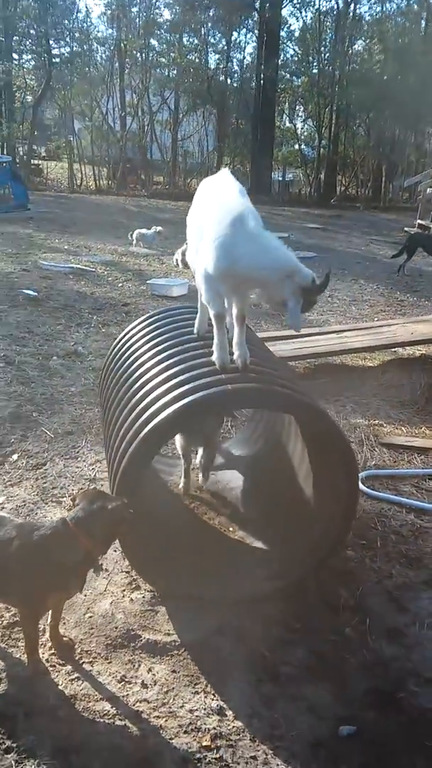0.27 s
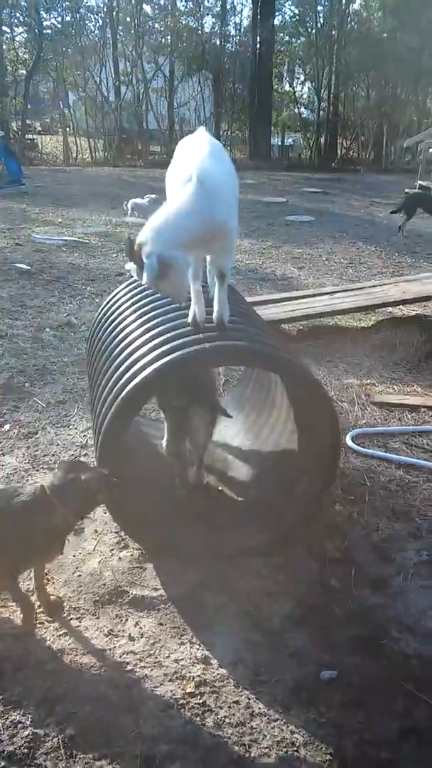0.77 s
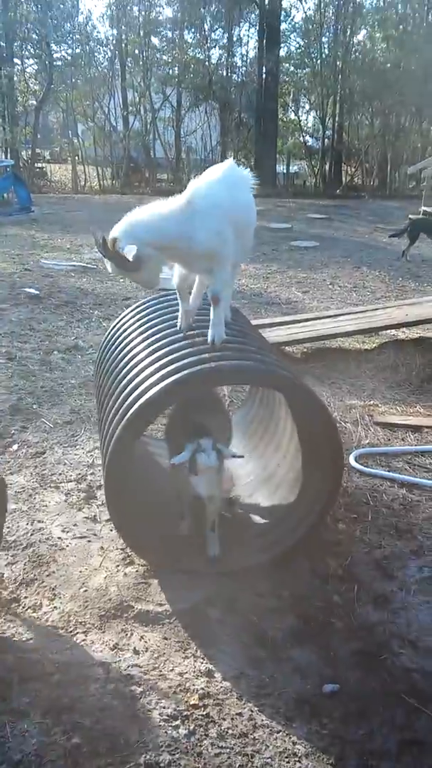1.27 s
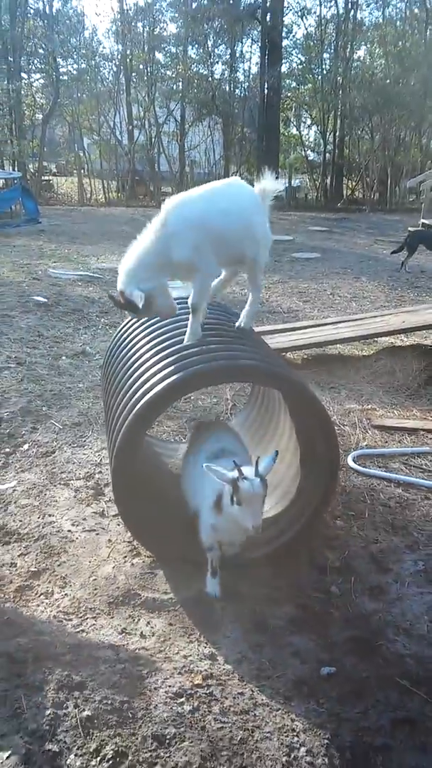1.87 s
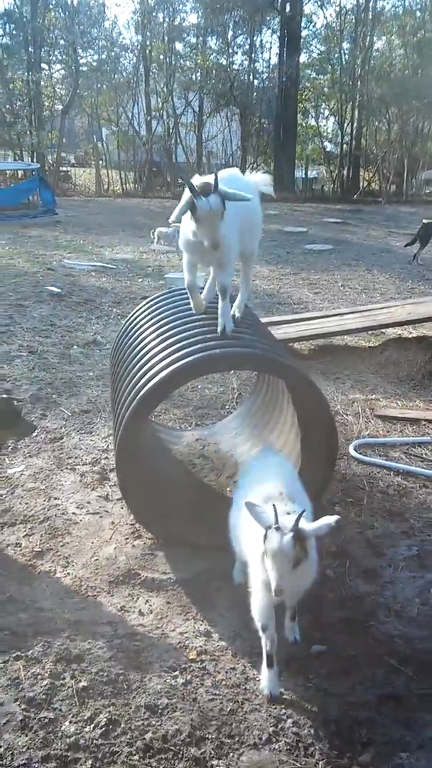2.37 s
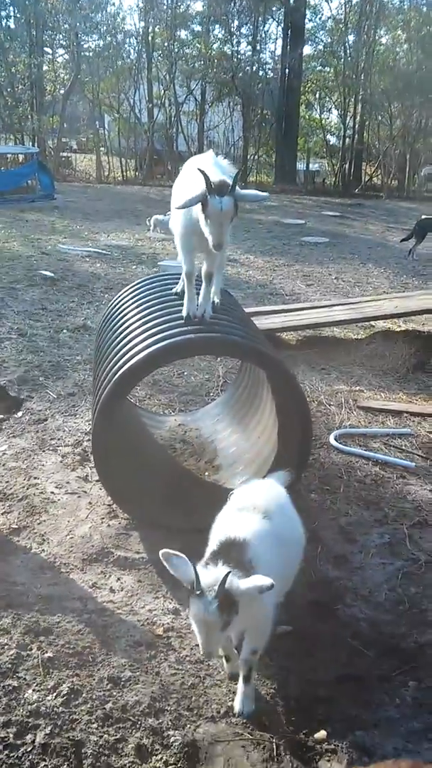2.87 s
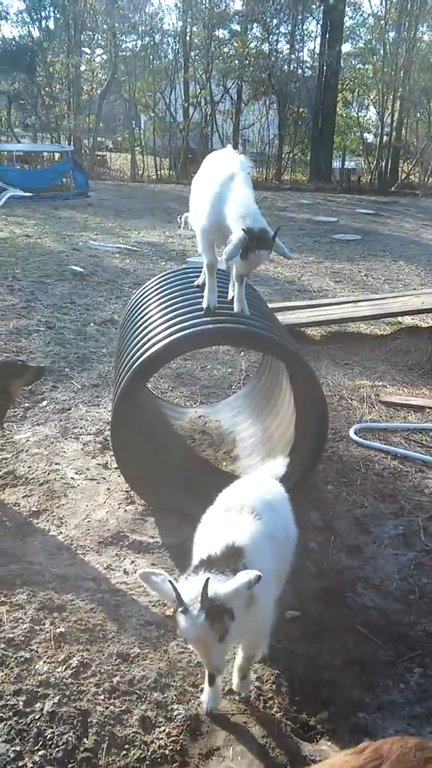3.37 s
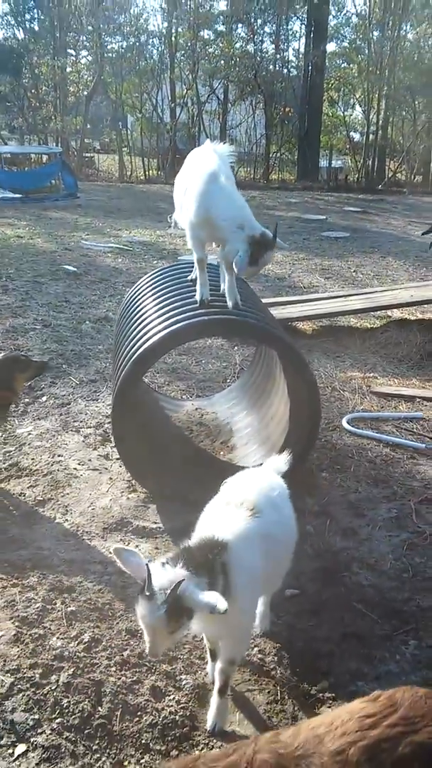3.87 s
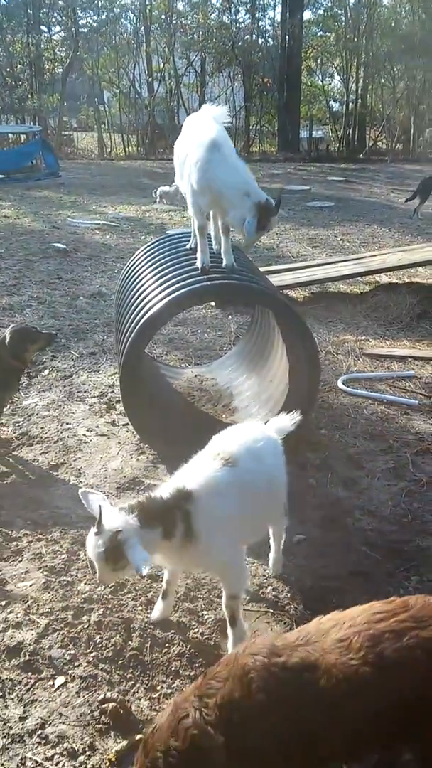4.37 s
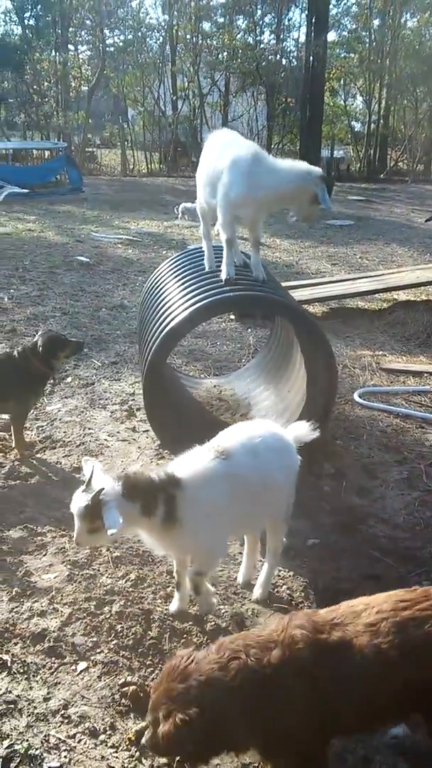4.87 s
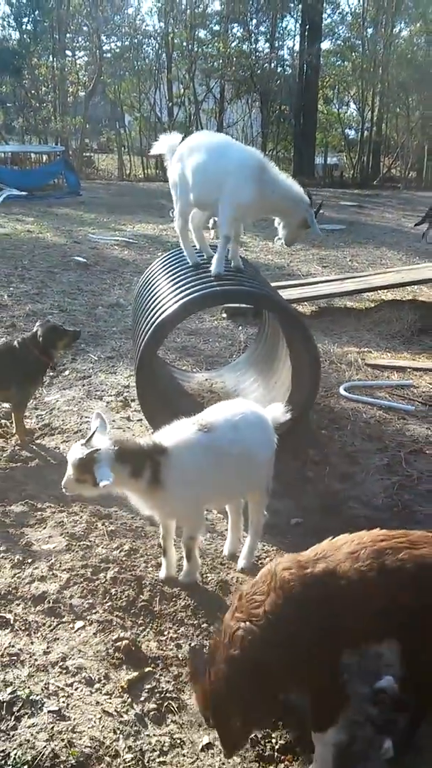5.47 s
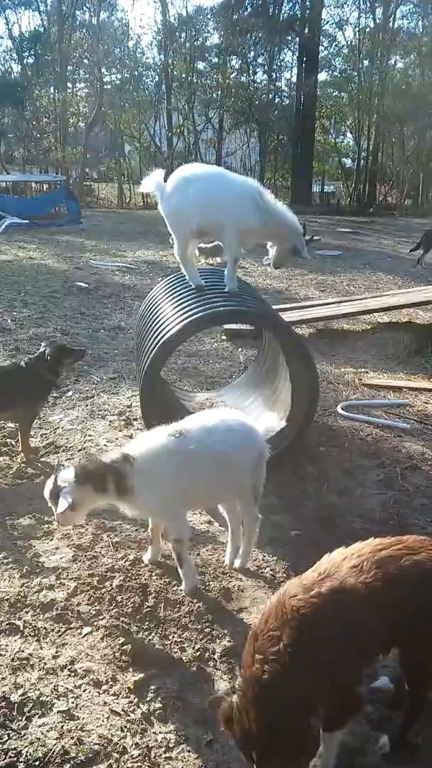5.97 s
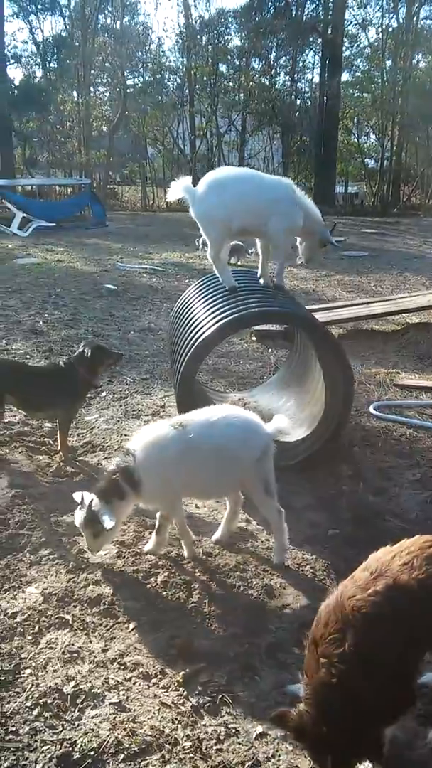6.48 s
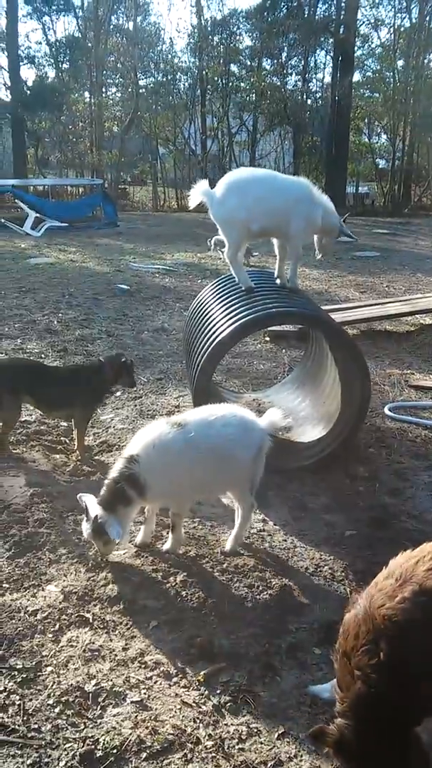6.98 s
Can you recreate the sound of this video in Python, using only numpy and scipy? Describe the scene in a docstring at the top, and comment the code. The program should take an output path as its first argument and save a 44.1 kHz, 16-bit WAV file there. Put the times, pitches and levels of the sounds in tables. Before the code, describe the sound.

In a yard with a faint low hum, dry leaves and dirt rustle softly. A dog gives one loud, high, yelping bark that echoes briefly off the trees. Right after, a goat's hooves clatter on a corrugated plastic pipe with dry taps and hollow thuds, and a small metal tag jingles faintly. Lighter, scattered hoof steps carry on to the end.

```python
"""A faint low hum hangs over a yard ringed by trees; dry leaves and dirt rustle and tick underfoot.
A goat sets a hoof softly on a big corrugated plastic pipe. Just after a second in, a dog gives one
high, yelping bark, which the trees echo, and a small tag jingles. Then the goat clatters about:
hoof edges tap the pipe wall and its weight sends hollow, falling thuds along it.
Lighter, scattered steps carry on to the end."""
import sys
import numpy as np
from scipy import signal
from scipy.fft import rfft, irfft
from scipy.io import wavfile
from scipy.ndimage import uniform_filter1d, minimum_filter1d

SR = 44100
rng = np.random.default_rng(int(sys.argv[2]) if len(sys.argv) > 2 else 0)


def generate_wav(signal):
    """Clip the signal to [-1, 1] and save it as 16-bit WAV at the path in sys.argv[1]."""
    frames = np.transpose(np.atleast_2d(signal))
    scaled = np.clip(frames, -1, 1) * 32767
    pcm = np.round(scaled).astype(np.int16)
    wavfile.write(sys.argv[1], SR, pcm)


N = 318622
T = np.arange(N) / SR


def undb(db):
    """Decibels to gain."""
    return 10 ** (np.asarray(db) / 20)


def unit(x):
    """Scale to an rms of one."""
    return x / np.sqrt(np.mean(x ** 2) + 1e-20)


def curves(rows):
    """Turn each column after the time into an automation curve, one value a sample."""
    s, *columns = np.transpose(rows)
    return [np.interp(T, np.sort(s), c) for c in columns]


def colour(x, points):
    """EQ a sound with a curve of (Hz, dB) points."""
    hz, db = np.transpose(points)
    bins_hz = np.fft.rfftfreq(len(x), 1 / SR)
    gain = undb(np.interp(np.log(bins_hz + 1), np.log(hz), db))
    return irfft(rfft(x) * gain, len(x))


def noise(points):
    """Coloured noise of unit level."""
    return unit(colour(rng.standard_normal(N), points))


def wander(rate):
    """Smooth random modulation that turns about rate times a second."""
    k = max(int(SR / rate), 1)
    return unit(uniform_filter1d(np.repeat(rng.standard_normal(N // k + 1), k), k)[:N])


def add(track, s, sound):
    """Mix a sound into a track at a time in seconds."""
    i = max(int(s * SR), 0)
    track[i:i + len(sound)] += sound[:max(N - i, 0)]


def delayed(x, s):
    """The sound, s seconds later."""
    return np.interp(T - s, T, x, left=0)


# Slow fader moves of the bed. Each row: time in seconds, then hum, air and stirring litter in dB.
BED_LEVELS = [(0, -49, -65.5, -63), (0.18, -48.5, -64, -62.5), (0.38, -56, -69, -66),
              (0.85, -54.5, -68.5, -66.5), (1.1, -59.5, -69.5, -71.5), (1.5, -55, -59, -58),
              (2.05, -51.5, -59.5, -56.5), (2.46, -64, -62, -57), (2.57, -75, -71, -74),
              (2.8, -65, -68.5, -65), (3.72, -65, -73, -79.5), (4.25, -59, -70, -73), (4.65, -61, -72, -72),
              (4.95, -55.5, -66, -70.5), (5.85, -45, -62, -61.5), (6.57, -48.5, -64.5, -67),
              (6.78, -56, -68, -68.5), (7.22, -63, -70, -70.5)]
# Tone of the low rumble and of the open air. Each row: frequency in Hz, level in dB.
RUMBLE_EQ = [(20, -30), (45, -15.5), (65, -2.5), (100, -2.5), (170, -2), (260, -12), (400, -26.5),
             (700, -47.5)]
AIR_EQ = [(100, 0), (300, 2.5), (550, -5), (1000, -1), (1550, -6), (2200, -14.5), (3500, -21),
          (6000, -24.5), (12000, -39)]


def hum_and_air(hum_hz=98.2, hum_db=-1, rumble_db=-4, air_db=1.5):
    """The bed: a wavering low hum in a soft rumble, and the open air."""
    low_db, open_db, _ = curves(BED_LEVELS)
    phase = 2 * np.pi * np.cumsum(hum_hz * (1 + .01 * wander(10))) / SR
    clarity = undb(.5 * (low_db - low_db.max()))  # the tone stands clear of the rumble as it swells
    hum = np.sqrt(2) * np.sin(phase) * clarity * undb(low_db + hum_db + wander(6.4))
    rumble = noise(RUMBLE_EQ) * undb(low_db + rumble_db) * (1.5 - clarity)
    air = noise(AIR_EQ) * undb(open_db + air_db + 0.42 * wander(15))
    return hum + rumble + air


# The crisp tone of dry leaves. Each row: frequency in Hz, level in dB.
RUSTLE_EQ = [(1760, -42), (3000, -14.5), (3480, -18), (5220, -20.5), (6220, -8), (8520, -5), (11100, 3),
             (15100, -4), (16000, -4.5)]


def leaf_rustle(rustle_envelope, spikiness=0.84, rustle_db=-0.5, crunch_db=1.5):
    """Dry leaves and dirt crackle faintly throughout and swell under each step."""
    _, _, stir_db = curves(BED_LEVELS)
    grains = rng.standard_normal(N) * np.exp(spikiness * rng.standard_normal(N))
    crackle = unit(colour(grains * undb(crunch_db * wander(150)), RUSTLE_EQ))
    return crackle * np.hypot(undb(stir_db), rustle_envelope) * undb(rustle_db)


# Cues for steps and, at 1.388 s, a brief high hiss trailing the bark.
# Each row: start in seconds, length in seconds, rustle level in dB, swell level in dB.
RUSTLE_CUES = [(0.209, .08, -58.5, -55), (0.412, 0.055, -56, -58), (0.606, .17, -59.5, -51.5),
               (0.879, 0.089, -56, -51.5), (1.388, 0.093, -54.5, -62), (1.623, 0.024, -54.5, -68),
               (1.703, 0.055, -51, -50), (1.846, 0.015, -48.5, -68), (1.989, .04, -54, -53),
               (2.1, .12, -57.5, -59.5), (2.63, .04, -56.5, -61), (2.83, .05, -64.5, -66),
               (2.948, 0.13, -68, -56.5), (3.226, 0.24, -66, -51), (3.514, 0.043, -66, -51),
               (3.805, 0.22, -88.5, -56), (4.011, 0.022, -64, -62), (4.25, .07, -64, -54),
               (4.43, .07, -73, -55.5), (4.72, .13, -66.5, -55.5), (5.358, .03, -58, -59),
               (5.872, 0.078, -65.5, -52.5), (6.23, 0.13, -66, -59), (6.58, .05, -64, -52.5),
               (6.98, .08, -67.5, -65.5)]


def cue_envelopes(attack_s=0.015, release_s=.025):
    """Envelopes for the rustle and the background swells: each cue rises, holds and dies away."""
    rustle, swell, t = np.zeros(N), np.zeros(N), T[:SR // 2]
    for s, length_s, rustle_db, swell_db in RUSTLE_CUES:
        shape = np.minimum(t / attack_s, 1) * np.exp(-np.maximum(t - length_s, 0) / release_s)
        add(rustle, s, undb(rustle_db) * shape)
        add(swell, s, undb(swell_db) * shape)
    return rustle, swell


def background_swells(swell_envelope, low_db=-2, mid_db=-14, flicker_db=2):
    """Low rumble and dull midrange noise swell briefly with each cue."""
    low = noise([(20, -32), (45, -23), (65, -7), (100, 4), (170, -10.5), (260, -15),
                 (400, -28.5), (700, -46)])
    mid = noise([(200, -2), (550, -4.5), (1000, -1.5), (1550, -9.5), (2200, -16),
                 (3500, -29.5), (8000, -29)])
    return swell_envelope * (undb(low_db) * low + undb(mid_db + flicker_db * wander(60)) * mid)


# Snaps underfoot. Each row: start in seconds, level in dB.
SNAPS = [(0.2279, -38), (0.2818, -29.5), (0.414, -31), (0.667, -27.5), (0.7492, -35), (0.9505, -34),
         (1.5613, -35), (1.727, -23), (2.2126, -27), (2.3337, -35), (2.6375, -34.5), (2.8459, -34.5),
         (3.4166, -30.5), (4.123, -38.5), (4.4528, -41), (6.5879, -40.5)]


def twig_snaps(decay_s=.0004, snap_db=-8):
    """Dry twigs and grit break in tiny, bright bursts of noise."""
    out, t = np.zeros(N), T[:SR // 100]
    for s, db in SNAPS:
        snap = rng.standard_normal(len(t)) * np.exp(-t / decay_s)
        add(out, s, undb(db + snap_db) * snap / np.abs(snap).max())
    return colour(out, [(1000, 3), (4500, -26), (7000, 5.0), (10000, 14.5), (16000, 14)])


# Hoof blows on the pipe; the row at 5.931 s is not a new blow but a strong return of the 5.883 s blow bouncing
# along the pipe. Each row: start in seconds, tap level in dB, tuning of the spot as a ratio, brightness in dB
# per octave, scuff length in seconds, thud level in dB, opening thud pitch in Hz.
HOOVES = [ (0.458, -57.5, 0.86, 9, 0.0052, -69, 350), (1.689, -33.5, 0.93, -3, 0.0082, -25, 421),
          (1.706, -24.5, 1.03, -3, 0.0032, -46, 400), (1.712, -25, 0.99, -13, .007, -28, 402),
          (1.731, -45.5, 1.35, 20, 0.0035, -21, 232.6), (1.765, -36.5, 1, -2, 0.011, -44, 302),
          (1.864, -26, 1, 6, 0.0074, -20, 488.3), (1.871, -29.5, 1.03, 14.5, 0.003, -20.5, 388),
          (1.892, -55, 0.83, -5, 0.0085, -24, 352), (1.99, -38, 0.99, 3.5, 0.014, -20.5, 300.6),
          (2.019, -21, 1.1, -14.5, 0.0027, -17.5, 327), (2.041, -36.5, 1.02, -18, 0.0053, -55, 331),
          (2.165, -29.5, 0.91, -5, 0.002, -39.5, 450), (2.184, -43, 1.03, 8, 0.0072, -43.5, 400),
          (2.203, -34.5, 1.08, 4, 0.0047, -41, 390), (2.265, -48, 0.96, 5, 0.0013, -58, 351),
          (2.338, -25, 1.03, -3.5, 0.001, -34.5, 413), (2.394, -53, 1, 15, .007, -41, 347.4),
          (2.795, -58, 1.08, -2.5, 0.011, -65, 300), (2.956, -46.5, 1.09, 3, 0.0074, -45.5, 407),
          (3.227, -41.5, 1.08, -12, 0.011, -30, 406), (3.274, -46.5, 1.13, -10, 0.017, -41.5, 393.4),
          (3.794, -44, 1.19, -5.5, .004, -60, 347), (3.943, -54.5, .8, -0.5, 0.012, -38, 329.6),
          (4.227, -61, 1.1, 1.5, 0.021, -42.5, 297), (4.741, -42, 1.07, -14, 0.0053, -54, 380),
          (4.765, -44, 1.03, -7, .018, -44, 322.2), (4.811, -40, .99, -7.5, 0.012, -47, 391.5),
          (4.89, -54.5, 0.98, -3, .007, -48, 340), (5.012, -50, 1.06, -10, .02, -58.5, 348.5),
          (5.13, -55.5, 1, 3, 0.0048, -43, 327), (5.181, -48, 0.92, 1.5, 0.013, -46, 381),
          (5.315, -58, 1.02, -4.5, 0.0021, -44, 359.4), (5.384, -38, 1.06, -8, 0.0053, -52.5, 378),
          (5.765, -46, 1.04, -2.5, 0.0033, -59, 350), (5.883, -27.5, 1.03, -19.5, .003, -42.5, 417),
          (5.931, -43, 1, -12, 0.02, -64, 383), (6.064, -37, 1.03, -12, 0.0092, -39.5, 310),
          (6.473, -60, 1, 12, .005, -67, 300), (6.614, -57, 1.03, 1.5, 0.006, -60, 320),
          (6.991, -66, 1.4, -1, 0.0051, -56, 260)]
# The ring of the pipe wall. Each row: mode frequency in Hz, level in dB, seconds to fade by 60 dB.
WALL_MODES = [(763, -12, 0.0257), (964.4, 5, 0.059), (1144, -16, 0.011), (1428, 0, 0.04),
              (1740, -18, 0.019), (1850, -26, 0.17), (2410, -6.5, 0.029), (2770, -44, 0.037),
              (3400, -40, 0.019), (3660, -31, 0.023), (4330, -32, 0.07)]


def hoof_taps(scuff_share=0.92, ring_db=-3.0, pivot_hz=1100, firm_s=0.0034, drag_db=-13, drag_s=0.028):
    """A hoof edge hits, skids over the ribs and drags to rest; harder contact rings the higher modes."""
    out, t = np.zeros(N), T[:SR // 6]
    attack = 1 - np.exp(-t / .0012)
    for s, db, tuning, bright_db, scuff_s, _, _ in HOOVES:
        grains = rng.standard_normal(len(t))
        skid = grains ** 3 * np.exp(-t / scuff_s)
        drag = grains[::-1] * np.exp(-t / drag_s)
        force = scuff_share * scuff_s / (scuff_s + firm_s) * skid / np.linalg.norm(skid)
        force += undb(drag_db) * drag / np.linalg.norm(drag)
        force[0] += firm_s / (scuff_s + firm_s) + 0.27  # the first hit of the edge
        ring = np.zeros(len(t))
        for k, (hz, mode_db, t60) in enumerate(WALL_MODES):
            detune = 1 + rng.standard_normal() / 200  # every spot rings a little differently
            tilt_db = bright_db * np.log2(min(hz, 1900) / pivot_hz)
            fade = undb(mode_db + tilt_db - 60 * t / t60)
            ring += (-1) ** k * fade * np.sin(2 * np.pi * hz * tuning * detune * t)
        add(out, s, undb(db + ring_db) * signal.fftconvolve(force, ring * attack)[:len(t)])
    return out


# The dry crack of hoof on plastic. Each row: frequency in Hz, level in dB.
CRACK_EQ = [(500, -41), (850, 7.5), (1050, 8), (1300, 2), (1650, 8), (2200, -14.5), (2900, -12),
            (3500, -24.5), (5000, -50), (9000, -64)]


def hoof_cracks(crack_db=-10, bright_share=0.76):
    """Grit crushed under each hoof gives a dry, toneless scrape, loudest on hard contacts."""
    load, t = np.zeros(N), T[:SR // 8]
    for s, db, _, bright_db, scuff_s, _, _ in HOOVES:
        age = t / (.004 + scuff_s / 2)
        add(load, s, undb(db + crack_db + bright_share * bright_db) * age * np.exp(1 - age))
    return load * noise(CRACK_EQ)


# The pipe's hollow body under a heavy step. Each row: frequency in Hz, level in dB.
BODY_EQ = [(110, -52), (180, -12), (236, 6.5), (270, -1.5), (310, 4.5), (400, 0), (480, -3), (580, -52),
           (800, -57.5)]


def hoof_thuds(fall_share=0.377, fall_s=0.0623, lag_s=.004, wave_db=-4.0, body_slope=0.26):
    """Bending waves run along the ribbed wall; the low ones arrive last, so each thud sinks in pitch."""
    waves, load, t = np.zeros(N), np.zeros(N), T[:SR // 5]
    for s, _, _, _, scuff_s, db, hz in HOOVES:
        start = s + lag_s  # the weight follows the edge
        pitch = hz * (1 - fall_share * (1 - np.exp(-t / fall_s)))
        age = t / (0.0057 + 0.56 * scuff_s)  # a longer skid loads the wall more slowly
        swell = age * np.exp(1 - age)
        add(waves, start, undb(db + wave_db) * swell * np.sin(2 * np.pi * np.cumsum(pitch) / SR))
        add(load, start, undb(db - body_slope * (db + 21.0)) * swell)
    # the ribs scatter each wave into the body's many close modes, a larger share on soft steps
    scattered = undb(wave_db - 9) * load * noise(BODY_EQ)
    return waves + scattered


def pipe_resonance(blows, round_trip_s=.023, return_db=-17, trip_loss_db=-5, boom_db=-11, boom_t60=0.28):
    """Sound bounces between the open ends of the pipe; the low notes linger in its hollow."""
    flutter = sum(undb(return_db + k * trip_loss_db) * delayed(blows, (k + 1) * round_trip_s)
                  for k in range(4))
    t = T[:SR // 2]
    hollow = rng.standard_normal(len(t)) * undb(-60 * t / boom_t60) * (1 - np.exp(-t / 0.0064))
    boom = signal.fftconvolve(blows, hollow / np.linalg.norm(hollow))[:N]
    return blows + flutter + undb(boom_db) * colour(boom, [(450, 0), (1000, -7), (3000, -14)])


def yard_echo(x, near_db=-15, near_t60=0.37, woods_db=-26, woods_t60=.85, echo_db=-37, echo_s=.22):
    """Scatter from the ground and sheds, a longer wash from the woods and a soft tree-line echo."""
    t = T[:2 * SR]
    build = 1 - np.exp(-t / .015)
    treeline = np.exp(-((t - echo_s) / .025) ** 2)
    envelopes = [undb(-60 * t / near_t60) * build, undb(-60 * t / woods_t60) * build, treeline]
    tails = rng.standard_normal((3, len(t))) * envelopes
    near, woods, echo = tails / np.linalg.norm(tails, axis=1, keepdims=True)
    # soft ground swallows the low mids, leaves and air the top, more so from far away
    outdoor_eq = [(200, -7.0), (700, -9.5), (1200, -4.5), (1470, 1.5), (1900, -2.0), (2900, -0.5),
                  (3800, -8.5), (6000, -5.5), (14000, -11)]
    response = undb(near_db) * near + colour(undb(woods_db) * woods + undb(echo_db) * echo, outdoor_eq)
    return colour(signal.fftconvolve(x, response[:SR])[:N], outdoor_eq)


def glide(rows, waver, harmonic=1):
    """A wavering tone, or one of its overtones, along rows of seconds, Hz and dB."""
    hz, db = curves(rows)
    gate = (T > rows[0][0]) & (T < rows[-1][0])
    cycles = np.cumsum(hz * (1 + waver * wander(400))) / SR
    return gate * undb(db) * np.sin(2 * np.pi * harmonic * cycles)


# The arc of the bark. Each row: time in seconds, pitch in Hz, then fundamental, octave, overtones
# and rasp in dB.
BARK = [(1.195, 580, -49.5, -66.5, -74.5, -78), (1.21, 601.3, -28, -45, -44.5, -59.5),
        (1.235, 599.5, -25, -11.5, -24.5, -24), (1.263, 677.8, -18.5, -7.5, -14.5, -17),
        (1.284, 734.6, -11, -3, -16, -28), (1.297, 721, -20, -9, -24.5, -37),
        (1.318, 739.5, -39.5, 1.5, -27.5, -41), (1.328, 723, -35, -4.5, -29, -37),
        (1.331, 908, -14.5, -23, -36.5, -33), (1.344, 752, -5.5, -24, -37.5, -34),
        (1.375, 524, -47.5, -63.5, -75, -63)]
# A thin whistle in the voice, and one vocal fold running ahead of the other until the two lock.
# Each row: time in seconds, pitch in Hz, level in dB.
SQUEAK = [(1.198, 601.6, -50), (1.212, 941, -15.5), (1.219, 1232, -20.5), (1.232, 1501, -3.5),
          (1.25, 1490, -21.5), (1.32, 1472, -32.5), (1.332, 1463, -7.5), (1.346, 1503, -7),
          (1.375, 1480, -46)]
STRAY_FOLD = [(1.22, 596, -50), (1.231, 650, -11), (1.256, 750, -4), (1.272, 750, -14), (1.284, 725, -55)]
# The dog's throat and mouth, and their airy top. Each row: frequency in Hz, level in dB.
THROAT_EQ = [(350, -38), (520, -20.5), (720, -1), (1000, -10), (1400, 2.5), (1850, -3.5), (2200, -0.5),
             (2500, -11), (2850, -3.5), (3400, -15), (3900, -0.5), (4480, -19), (4800, -46), (5400, -13)]
MOUTH_AIR_EQ = [(6000, -29), (6700, -16), (8000, -22.5), (9250, -4.5), (10500, -19), (13000, -21),
                (16000, -36)]


def dog_bark(shimmer_db=8.5, overtone_slope=0.58, flutter_db=3, rasp_gain_db=7, stray_overtone_db=-15):
    """Vocal folds give a harsh rising yelp that clears into a ringing octave, breaks up and falls."""
    hz, fundamental_db, octave_db, overtone_db, rasp_db = curves(BARK)
    gate = (T > BARK[0][0]) & (T < BARK[-1][0])
    harshness = undb(rasp_db - rasp_db.max())
    hz = hz * (1 + (.005 + .02 * harshness) * wander(600))
    phase = 2 * np.pi * np.cumsum(hz) / SR
    # the folds never close twice alike, which blurs the high overtones most
    closure = phase + (.04 + .05 * harshness) * wander(700)
    # they close softly at first, so the voice brightens after it starts
    slope = overtone_slope + np.interp(T, [1.215, 1.24], [4, 0])
    buzz = sum((3 / k) ** slope * np.sin(k * closure) for k in range(3, 20))
    buzz *= undb(overtone_db + flutter_db * harshness * wander(450))
    # air tears through the folds once a cycle
    rasp = undb(rasp_db + rasp_gain_db) * rng.standard_normal(N) * (1 + 0.29 * np.cos(phase))
    core = gate * (undb(fundamental_db) * np.sin(phase) + undb(octave_db) * np.sin(2 * phase))
    stray = glide(STRAY_FOLD, waver=0.015)
    stray += undb(stray_overtone_db) * glide(STRAY_FOLD, waver=0.018, harmonic=3)
    squeak = glide(SQUEAK, waver=0.02)
    voice = (core + stray + squeak) * undb(shimmer_db * harshness * wander(300))
    # a small mouth radiates little below its first resonance
    voice = colour(voice, [(380, -27.5), (520, -7.5), (620, 0.5)])
    return voice + colour(gate * (buzz + rasp), THROAT_EQ + MOUTH_AIR_EQ)


# Faint clinks, like a collar tag. Each row: start in seconds, level in dB.
CLINKS = [(1.197, -50), (1.420, -57), (1.442, -44), (2.246, -42), (2.335, -33.5), (2.413, -47.5)]
# The ring of the tag. Each row: mode frequency in Hz, level in dB.
TAG_MODES = [(10000, 1), (11900, -2.5), (14200, -8)]


def tag_jingle(t60=0.071, clink_db=-5, chatter_db=4, uneven_db=3):
    """A small metal tag clinks high and thin, chattering on its ring; each clink favours other modes."""
    out, t = np.zeros(N), T[:SR // 6]
    for s, db in CLINKS:
        for hz, mode_db in TAG_MODES:
            fade = undb(mode_db + uneven_db * rng.standard_normal() - 60 * t / t60)
            add(out, s, undb(db + clink_db) * fade * np.sin(2 * np.pi * hz * t))
    return out * wander(700) * undb(chatter_db * wander(150))


def scene(pipe_send_db=-12):
    """Mono mix: bark and pipe feed the yard's echo; everything else stays dry."""
    bark = dog_bark()
    hooves = pipe_resonance(hoof_taps() + hoof_cracks() + hoof_thuds())
    rustle_envelope, swell_envelope = cue_envelopes()
    litter = leaf_rustle(rustle_envelope) + twig_snaps()
    swells = background_swells(swell_envelope)
    echo = yard_echo(bark + undb(pipe_send_db) * hooves)
    return (bark + hooves + echo + tag_jingle() + litter + swells + hum_and_air())[None]


def record(dry, ceiling=.98, top_hz=16000):
    """A fast limiter holds the peaks near full scale, and a steep low-pass cuts the top."""
    window = SR // 200
    needed_gain = 1 / np.maximum(np.abs(dry), 1)
    limited = ceiling * dry * uniform_filter1d(minimum_filter1d(needed_gain, window), window)
    return signal.sosfilt(signal.ellip(10, .1, 80, top_hz, fs=SR, output="sos"), limited)


dry = scene()
out = record(dry)
generate_wav(out)
```